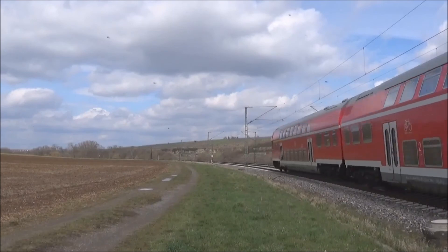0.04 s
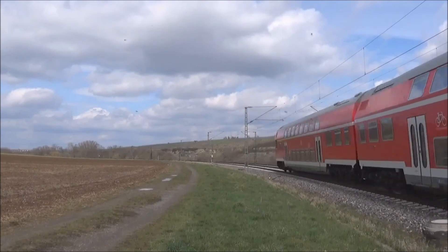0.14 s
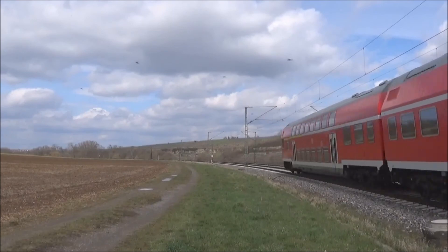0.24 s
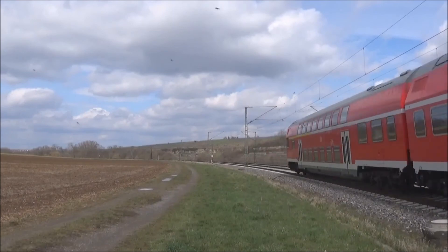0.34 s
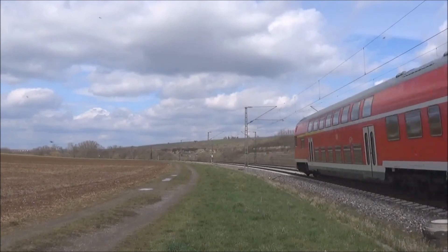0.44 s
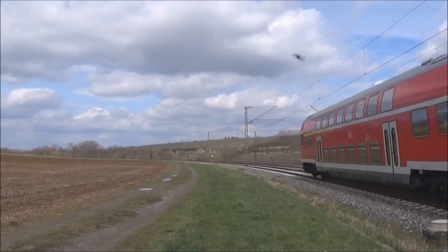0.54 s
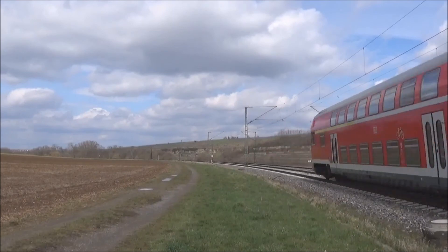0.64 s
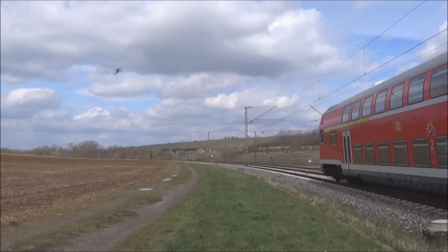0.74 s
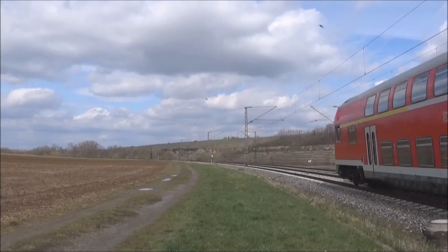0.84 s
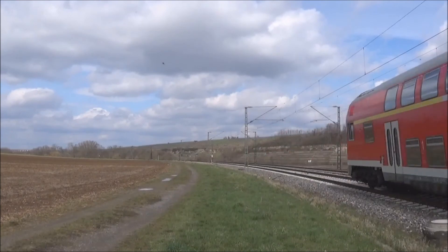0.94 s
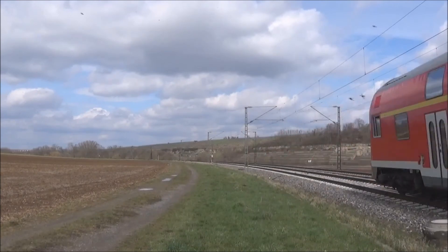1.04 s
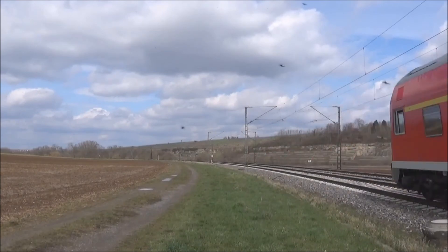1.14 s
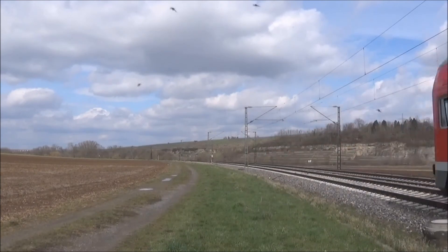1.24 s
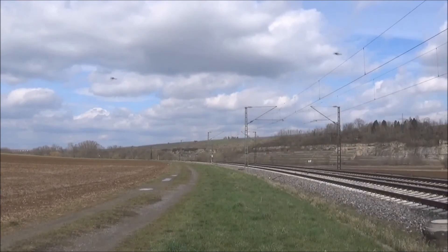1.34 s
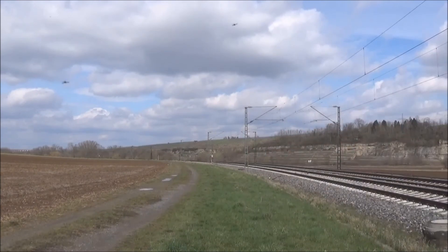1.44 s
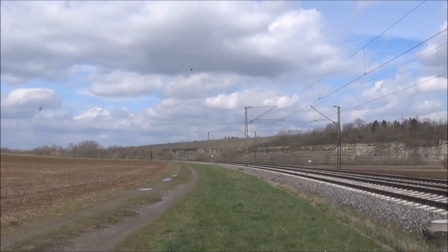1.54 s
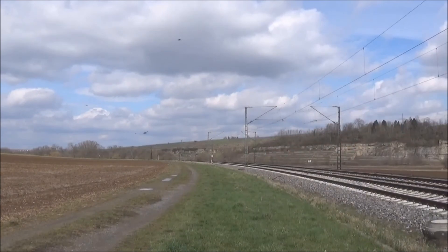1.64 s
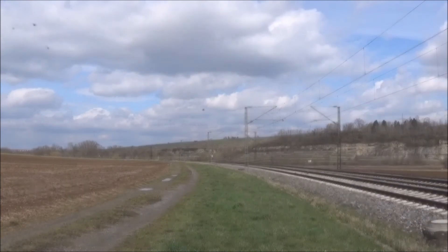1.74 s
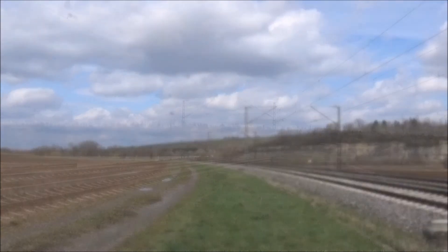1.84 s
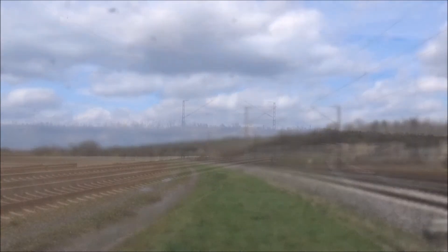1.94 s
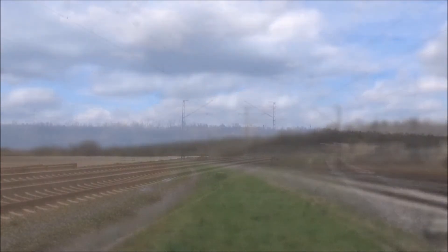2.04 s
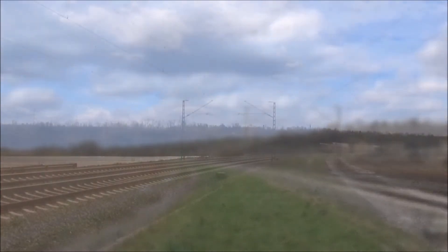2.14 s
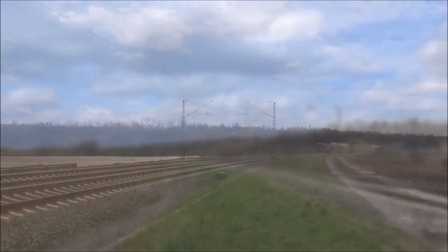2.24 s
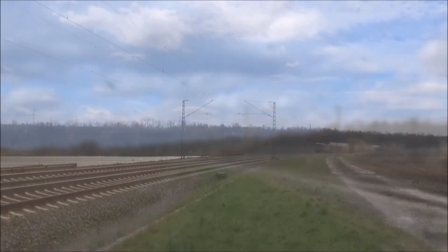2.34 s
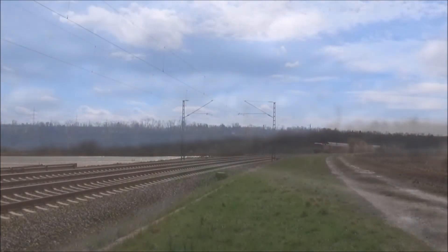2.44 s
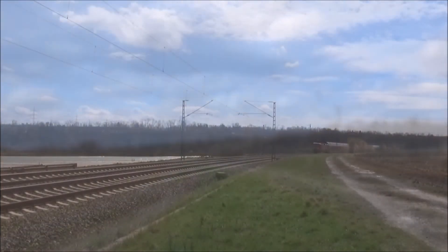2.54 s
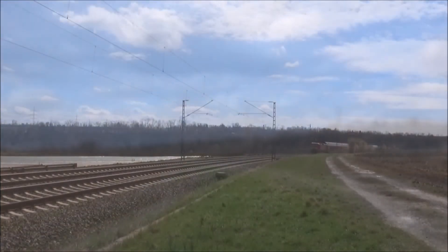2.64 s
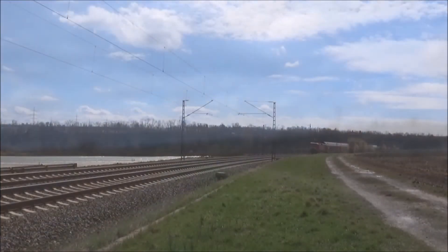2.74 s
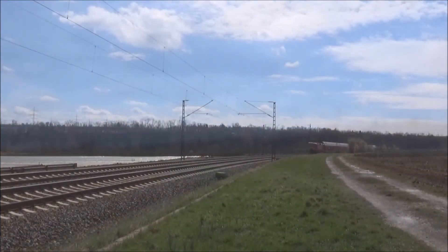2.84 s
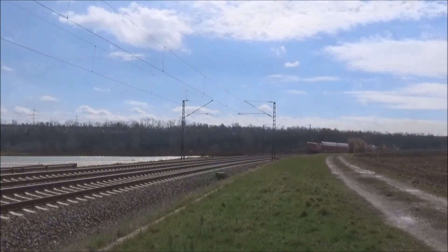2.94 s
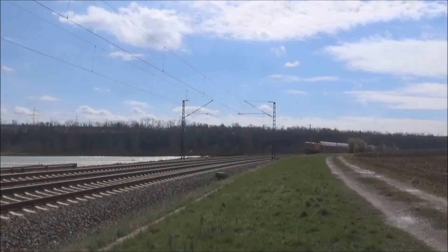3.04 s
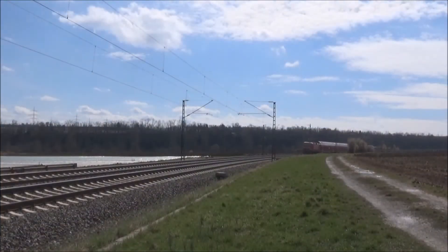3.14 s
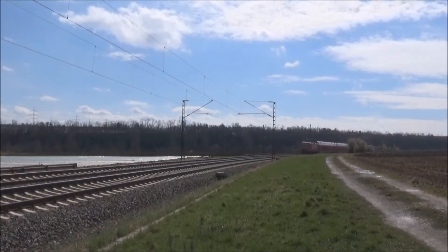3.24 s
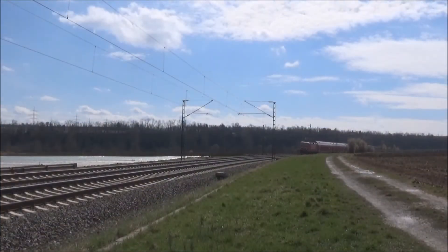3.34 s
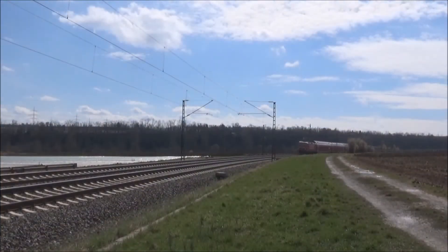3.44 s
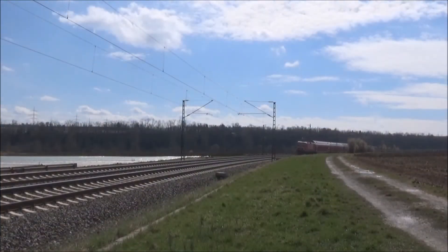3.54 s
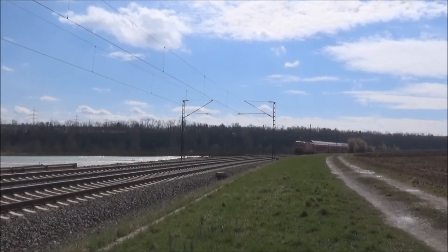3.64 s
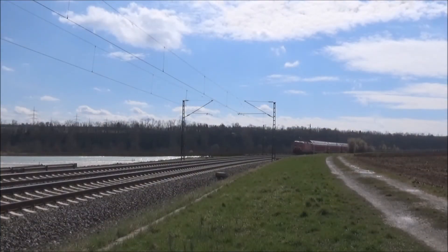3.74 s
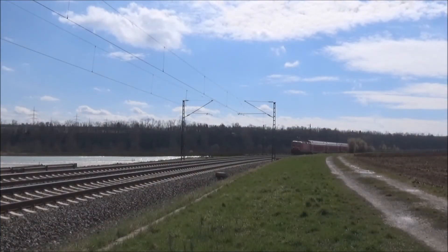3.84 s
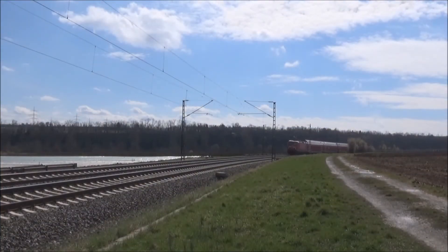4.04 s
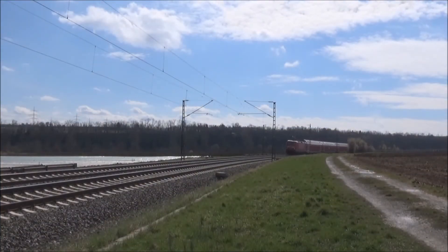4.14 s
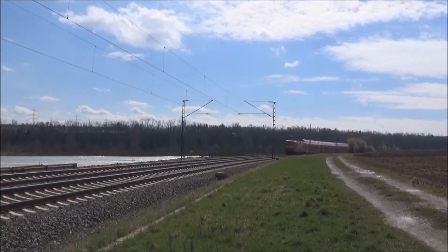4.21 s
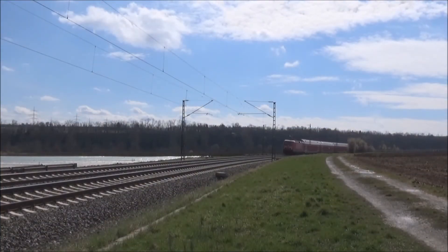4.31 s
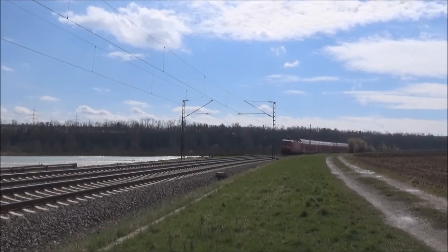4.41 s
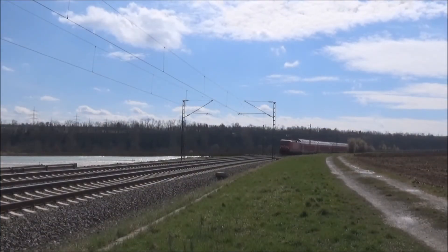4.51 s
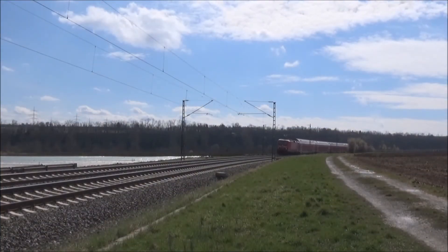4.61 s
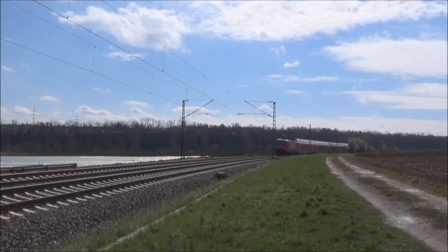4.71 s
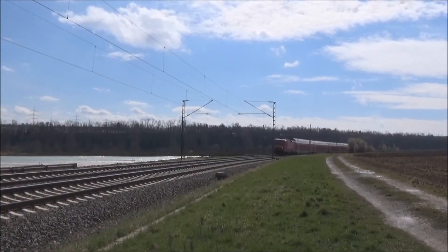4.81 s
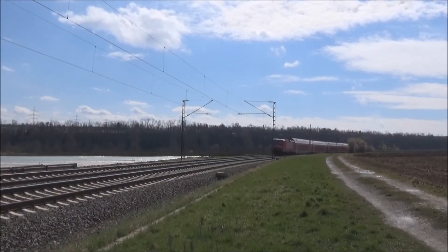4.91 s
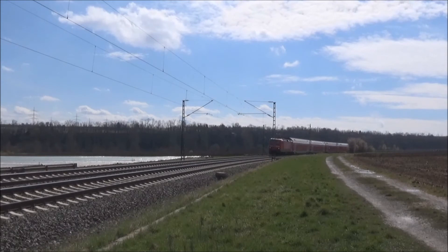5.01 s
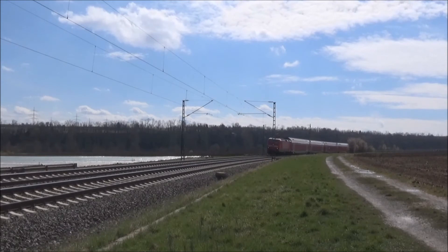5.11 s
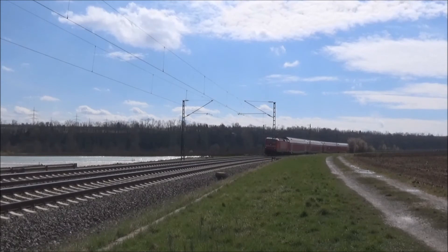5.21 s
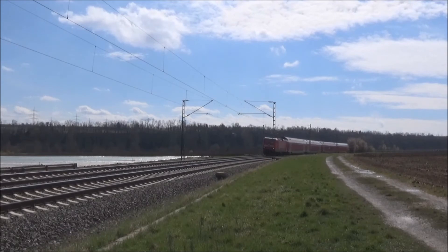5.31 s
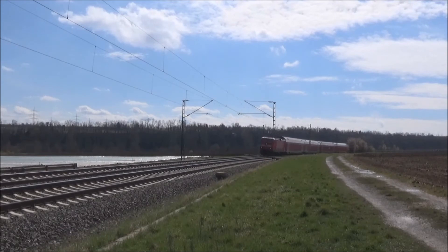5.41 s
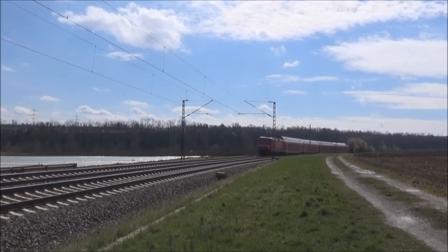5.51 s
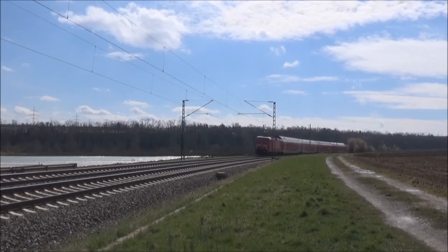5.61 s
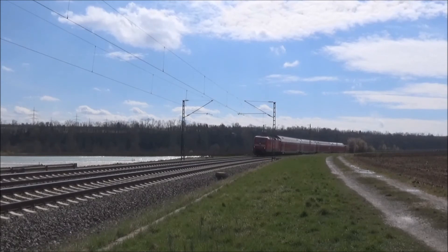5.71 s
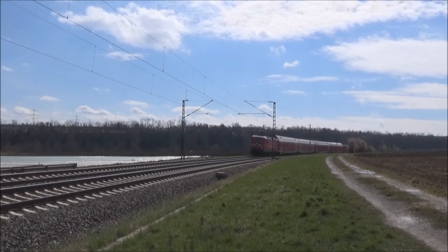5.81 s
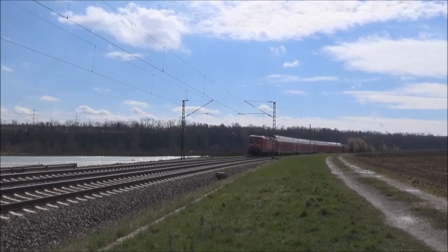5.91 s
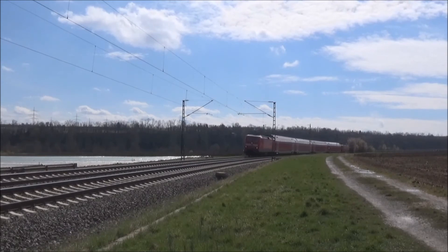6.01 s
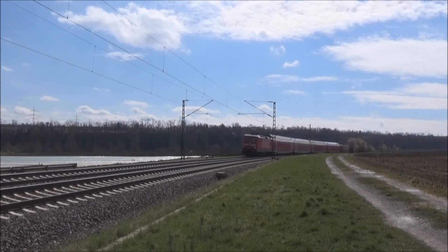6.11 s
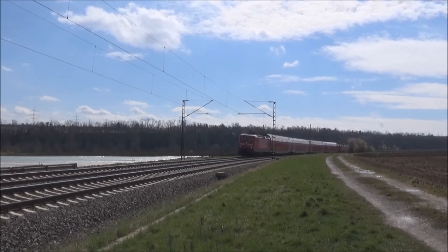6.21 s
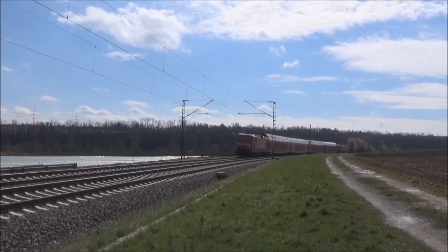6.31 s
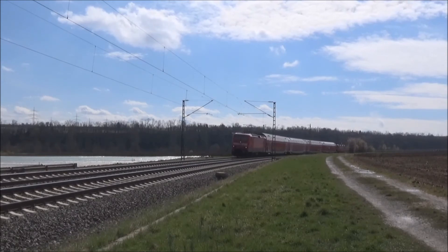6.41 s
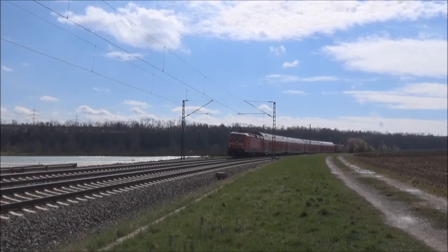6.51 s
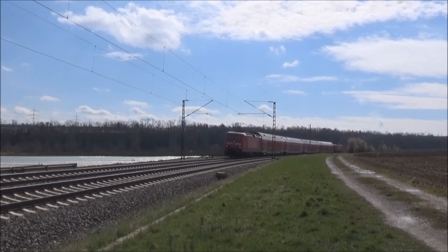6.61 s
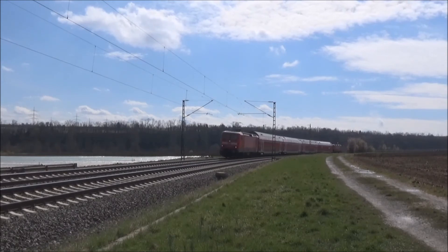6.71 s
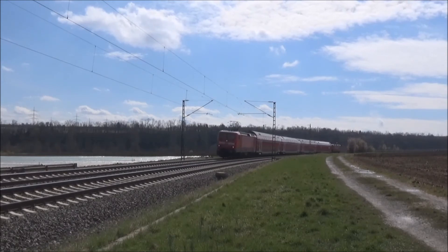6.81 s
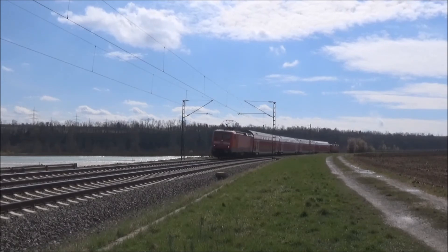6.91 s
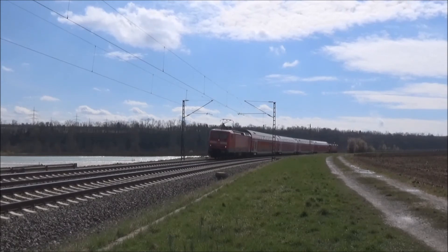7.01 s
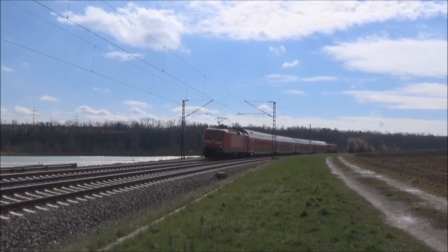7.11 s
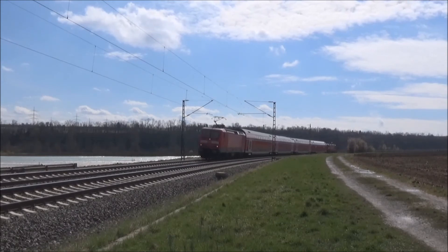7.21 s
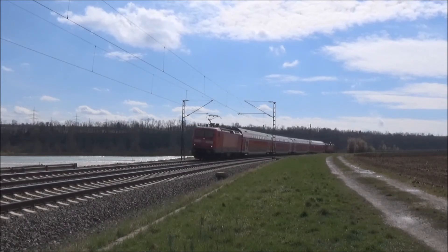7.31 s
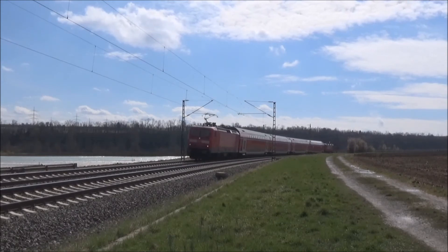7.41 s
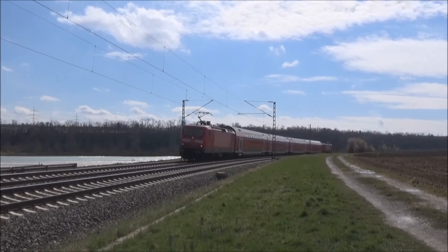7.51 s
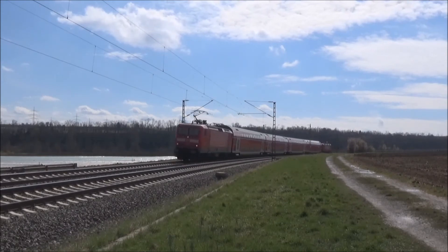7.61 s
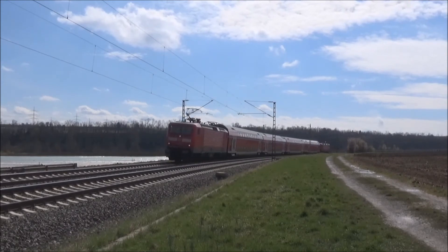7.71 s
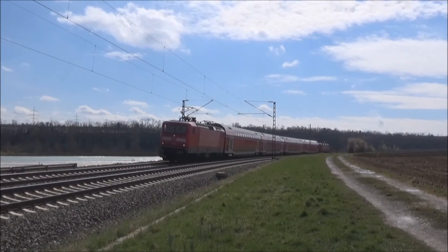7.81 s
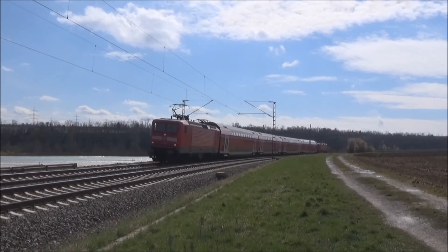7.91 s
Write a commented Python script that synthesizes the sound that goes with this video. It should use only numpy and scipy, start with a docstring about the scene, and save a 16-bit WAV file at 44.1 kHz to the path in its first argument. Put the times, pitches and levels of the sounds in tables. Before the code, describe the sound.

Stereo lineside pickup, outdoors and close to the track: broad rumbling, rolling and airy rush from departing coaches, leaning right, drop away into soft regular thumps. Thin high rail singing follows, with low lumpy gusts on the microphone and gritty metallic ticks. A hard crack comes as a strong, fluttering high hiss sets in, over the growing hum, whine, drone and rolling of an approaching electric train.

```python
"""Two electric trains from the lineside

Two microphone ports beside a railway. The last cars of a train roar past on the right and fade, a wheel flat
thumping. A second train nears round a curve: the rails sing ahead of it, its flanges hiss, its rolling swells.
Wind buffets the ports, the right rail ticks and one sharp crack rings out. Trains, rail and wind are filtered
noise with moving levels; thuds are short tone bursts that swell and die evenly; ticks and the crack are short
decaying tones, the crack with a noise snap.
"""
import sys
import numpy as np
from scipy import signal
from scipy.fft import rfft, irfft, next_fast_len
from scipy.io import wavfile
from scipy.ndimage import uniform_filter1d, map_coordinates

SR = 44100
rng = np.random.default_rng(int(sys.argv[2]) if len(sys.argv) > 2 else 0)


def undo_db(level):
    """Turn decibels back into plain size, where 20 dB means ten times bigger."""
    steps = np.asarray(level, float) / 20
    return 10 ** steps


def transcribe(signal):
    """Save signal, clipped to [-1, 1], as a 16-bit WAV file at the path in sys.argv[1]."""
    frames = np.atleast_2d(signal).T
    limited = np.clip(frames, -1, 1)
    pcm = np.round(limited * 32767).astype(np.int16)
    wavfile.write(sys.argv[1], SR, pcm)


N = 350595
T = np.arange(N) / SR
SIZE = next_fast_len(N)
HZ = np.fft.rfftfreq(SIZE, 1 / SR)
MIDDLE_DB = -42  # nearing train at middle closeness


def unit(x):
    """Scale to rms 1."""
    return x / np.sqrt(np.mean(x ** 2) + 1e-20)


def along(rows):
    """Columns after the frequency, read on a log axis."""
    hz, *cols = np.transpose(rows)
    return [np.interp(np.log(HZ + 1), np.log(hz + 1), c) for c in cols]


def curves(rows, rise_db=0., fall_db=0.):
    """Levels per sample; they climb before the first row and sink after the last by so many dB a second."""
    s, *cols = np.transpose(rows)
    edge = rise_db * np.maximum(s[0] - T, 0) + fall_db * np.maximum(T - s[-1], 0)
    return [np.interp(T, s, c) - edge for c in cols]


def tent(peak_s, rise_db, fall_db, hold_s=0.):
    """0 dB from peak_s for hold_s, climbing before and sinking after by so many dB a second."""
    return -rise_db * np.maximum(peak_s - T, 0) - fall_db * np.maximum(T - peak_s - hold_s, 0)


def wobble(rate):
    """A smooth random curve, rate knots a second."""
    return map_coordinates(rng.standard_normal(int(N * rate / SR) + 4), [T * rate])


def ports(gain, alike, lead, pan_db):
    """Spectra of one noise source at the left and right ports, mixed to the wanted likeness."""
    noise = rng.standard_normal((2, len(HZ))) + 1j * rng.standard_normal((2, len(HZ)))
    shared, apart = gain * noise
    turn = np.arccos(np.clip(alike, 0, 1)) / 2
    left = (np.cos(turn) * shared + np.sin(turn) * apart) * undo_db(pan_db / 2) * np.exp(.5j * lead)
    right = (np.cos(turn) * shared - np.sin(turn) * apart) * undo_db(-pan_db / 2) * np.exp(-.5j * lead)
    return np.array([left, right])


def patches(shape, bins, frames):
    """Random gains of rms 1, smoothed over so many frequency bins and time frames."""
    across = uniform_filter1d(rng.standard_normal(shape), size=bins, axis=0)
    return unit(uniform_filter1d(across, size=frames, axis=1))


def patchy(spectra, patchy_db):
    """Sound of the spectra with random patches of gain; the mean of the ports has rms 1."""
    z = signal.stft(irfft(spectra, SIZE)[:, :N], nperseg=512)[2]
    brief_broad = patches(z.shape[1:], bins=6, frames=5)
    long_narrow = patches(z.shape[1:], bins=2, frames=30)
    gain = undo_db(patchy_db * (0.74 * brief_broad + 0.61 * long_narrow))
    pair = signal.istft(z * gain, nperseg=512)[1][:, :N]
    return pair / np.sqrt(np.mean(pair.mean(axis=0) ** 2))


def roar(spectrum, image, patchy_db):
    """Broad noise placed between the ports."""
    return patchy(ports(undo_db(along(spectrum)[0]), *along(image)), patchy_db)


def sing(modes, image, patchy_db):
    """Roughness drives each resonance; steel confines it to a steep-sided band."""
    power = sum((undo_db(db) / (1 + (2 * (HZ - hz) / width) ** 4)) ** 2 for hz, width, db in modes)
    return patchy(ports(np.sqrt(power), *along(image)), patchy_db)


def add(track, s, sound):
    """Mix a short sound in at time s."""
    at = round(s * SR)
    track[at:at + len(sound)] += sound


# Colours of the leaving train's layers: [f/Hz, relative level/dB per Hz]
RUMBLE = [(30, -74), (60, -17.5), (110, -11), (180, 1), (300, -3.5), (450, -8.5), (600, -33)]
BOGIE = [(280, -26), (400, -1), (550, 2), (700, 0.5), (900, -2.5), (1100, -36)]
ROLLING = [(750, -36), (900, -1.5), (1350, -1), (1500, -6), (1900, -63)]
WHEEL_RING = [(1200, -34), (1500, -0.5), (2250, 0.5), (2550, -4.5), (2800, -1), (4000, -6.5), (4700, -64)]
AIR_RUSH = [(3400, -51), (4000, 0), (5000, -1), (5900, 0.5), (7000, -4.5), (8500, -8), (11100, -17)]
# How the leaving train falls on the ports: [f/Hz, likeness/0-1, left lead/rad, left over right/dB]
LEAVING_IMAGE = [(100, 1, -0.48, -0.5), (250, 0.93, -0.17, -4.5), (580, 0.7, -0.21, -9.5),
                 (1120, 0.76, 0.69, -12), (1780, 0.22, 0.72, -8), (3200, 0.45, 0.72, -5),
                 (5900, 0.73, 0.14, -4), (8240, 0.3, -0.24, -5), (9600, 0.75, -0.23, 6.5),
                 (10800, 1, 0, -1)]
# The leaving train's fade: [t/s, level/dB]
FADE = [(0.0, -1), (0.35, -1), (0.8, -1.5), (1.2, -3), (1.5, -4.5), (1.8, -9), (2.1, -18), (2.4, -24.5),
        (2.7, -31)]
# Rumble, bogie, rolling, wheel ring, air rush: [full level/dB, share of the fade, lateness/s, centre f/Hz]
LEAVING_LAYERS = [(-24.5, 0.96, 0.23, 240), (-24, 1.1, 0.17, 550), (-24, 0.68, -0.19, 1150),
                  (-23.5, 1.15, -.08, 2000), (-25.5, 1.19, 0.081, 7100)]
# Bogies going by, each with its own colour: [t/s, level/dB, centre f/Hz]
BOGIE_SURGES = [(0.2, 2.5, 553), (0.4, 3, 1200), (0.4, 1, 200), (0.7, 2.5, 2930), (0.95, 2.5, 900),
                (1.0, 2, 200), (1.35, 2.5, 497), (1.4, 4, 5500), (1.5, 2.5, 2510)]


def bogie_surges(hz):
    """Lift in dB at frequency hz as each bogie goes by, bell-shaped in time and pitch."""
    length_s, spread_octaves = 0.12, 0.76
    lift = 0
    for s, lift_db, centre_hz in BOGIE_SURGES:
        distance = ((T - s) / length_s) ** 2 + (np.log2(hz / centre_hz) / spread_octaves) ** 2
        lift += lift_db * np.exp(-distance)
    return lift


def leaving_train():
    """Bogies, wheels and air rush of the cars going by as bands of noise, with one singing wheel."""
    shudder_db = 0.58 * wobble(8.87) + 0.88 * wobble(24.77)
    fade_db, = curves(FADE, fall_db=30)
    wheel_db = -34.5 + 0.82 * fade_db + 2.9 * wobble(9)
    # wheel resonance: f/Hz, width/Hz, level/dB
    sound = undo_db(wheel_db) * sing([(707, 69, 0)], LEAVING_IMAGE, patchy_db=2.5)
    spectra = RUMBLE, BOGIE, ROLLING, WHEEL_RING, AIR_RUSH
    for (db, share, late_s, hz), spectrum in zip(LEAVING_LAYERS, spectra):
        layer_fade_db = share * np.interp(T - late_s, T, fade_db)
        level_db = db + layer_fade_db + bogie_surges(hz) + shudder_db
        sound += undo_db(level_db) * roar(spectrum, LEAVING_IMAGE, patchy_db=1.0)
    return sound


def wheel_flat():
    """A dull tone burst of a cycle and a half each time the flat meets the rail, duller as it recedes."""
    track, t = np.zeros(N), np.arange(-400, 400) / SR
    start_s, turn_s, thuds = 1.7655, .1023, 12  # start of the first burst, time of a wheel turn, count
    for k, scatter in enumerate(rng.standard_normal(thuds)):
        hz = 260 - 5.5 * k
        half_length_s = .003 + 0.00021 * k
        thud = np.cos(2 * np.pi * hz * t) * np.exp(-(t / half_length_s) ** 2)  # swells and dies evenly
        add(track, start_s + turn_s * k, undo_db(1.9 * scatter) * thud)
    level_db = -17 + tent(2.1, rise_db=17, fall_db=30.5)
    return track * undo_db(level_db) * undo_db([[-2.1], [2.1]])  # leans right


# How the rail falls on the ports, the left one deaf near 8 kHz:
# [f/Hz, likeness/0-1, left lead/rad, left over right/dB]
RAIL_IMAGE = [(1200, 0.77, 0.26, 8.5), (2320, 1, -0.5, 6.5), (6060, 1, -1.44, 7), (7000, 0.7, -2, 3),
              (7670, 0.7, -3, -4), (7940, 0.82, -2.5, -12), (8220, 0.1, -2.5, -16), (8350, 0.2, 2.2, -9),
              (8800, 1, -3, -17.5), (8800, 1, -3.5, -13), (8900, 1, 3, -5), (9500, 0.95, -0.1, -3),
              (10900, 0.99, 0, -1.5)]
# Far singing of the rail: [t/s, level/dB]
SINGING = [(2.3, -52.5), (2.65, -58), (3.2, -52.5), (3.55, -51), (3.8, -45), (4.6, -44.5), (4.8, -42.5)]
# Resonances of the far singing: [f/Hz, width/Hz, relative level/dB]
FAR_MODES = [(5860, 250, -4.5), (5950, 65, 3.5), (6040, 310, -11), (7740, 550, -1), (8300, 230, -4),
             (8800, 490, -15), (9680, 83, 2), (9930, 490, -11), (10600, 70, -7), (10950, 160, -13)]


def far_singing():
    """High rail resonances, driven by roughness, sing ahead of the second train."""
    level_db, = curves(SINGING, rise_db=20, fall_db=8)
    return undo_db(level_db + 1.9 * wobble(25)) * sing(FAR_MODES, RAIL_IMAGE, patchy_db=-0.5)


# Vibration of the nearing train carried by the rails: [t/s, level/dB]
RAIL_VIBRATION = [(2.4, -54), (2.65, -52), (3.15, -45.5), (3.55, -43), (3.85, -40.5), (4.35, -37.5),
                  (4.6, -38.5), (4.95, -34.5), (5.15, -37.5), (5.35, -35), (5.6, -36.5), (5.97, -36),
                  (6.15, -32), (6.55, -32.5), (6.75, -40), (6.95, -34.5), (7.3, -36.5), (7.6, -34.5),
                  (7.8, -33.5), (7.95, -42)]
# Resonances of the hum, then of the whine: [f/Hz, width/Hz, relative level/dB]
HUM = [(990, 85, -5), (1084, 81, -1), (1169, 92, 3), (1308, 120, 0.5), (1426, 93, -1.5)]
WHINE = [(2322, 113, 0), (2295, 180, -11.5)]


def rail_hum():
    """Hum and whine of the nearing train carried by the rails; the whine gains on the hum once near."""
    hum_db, = curves(RAIL_VIBRATION, rise_db=20)
    near_s, gain_db = 4.36, 3  # whine gain in dB a second
    whine_db = MIDDLE_DB - 13 + 0.97 * (hum_db - MIDDLE_DB) + gain_db * np.maximum(T - near_s, 0)
    hum = undo_db(hum_db + 0.31 * wobble(18)) * sing(HUM, RAIL_IMAGE, patchy_db=2.0)
    whine = undo_db(whine_db + 2.26 * wobble(21)) * sing(WHINE, RAIL_IMAGE, patchy_db=0.5)
    return hum + whine


# Closeness of the nearing train, as its rolling through the air: [t/s, level/dB]
CLOSENESS = [(2.75, -57.5), (3.05, -57.5), (3.55, -53), (4.3, -46), (4.8, -42), (5.3, -42), (5.9, -40.5),
             (6.6, -37), (6.9, -38.5), (7.2, -35), (7.45, -34), (7.65, -32), (7.78, -30), (7.95, -32)]
# How the nearing train falls on the ports: [f/Hz, likeness/0-1, left lead/rad, left over right/dB]
NEARING_IMAGE = [(100, 1, -1.1, -1.5), (600, 0.95, 0.6, 0.88), (1800, 0.85, -0.1, 0.86),
                 (3740, 0.7, -0.3, .1), (4610, 0.073, -5.5, 2.4), (6850, 0.56, -0.5, 3),
                 (10000, 0.48, 3, 1)]
# Colours of its rolling and its brighter rush: [f/Hz, relative level/dB per Hz]
FAR_ROLLING = [(500, -33), (720, -7), (830, 3), (1000, -4), (1900, -1.5), (2900, -1.5), (3100, -3),
               (3800, -5), (4400, -9), (5500, -21.5)]
FAR_RUSH = [(2500, -27), (3500, -18.5), (4000, -0.5), (4450, 1.5), (4800, -0.5), (5000, -3), (5500, -1),
            (7000, -5.5), (9000, -10), (10500, -21), (11100, -24)]
# Resonances of its drone, then of its motor: [f/Hz, width/Hz, relative level/dB]
DRONE = [(132, 96, -5.5), (302, 138, 2.5), (610, 430, -6.5)]
MOTOR = [(526, 84, 0)]


def nearing_train():
    """Drone, motor and rolling carried by the air, brighter as the train closes in."""
    rolling_db, = curves(CLOSENESS, rise_db=20)
    nearer_db = rolling_db - MIDDLE_DB
    drone_full_db = -5  # the drone stops growing early
    drone_db = -42.5 + 1.16 * np.minimum(nearer_db - drone_full_db, 0)
    motor_db = -58.5 + 1.16 * nearer_db
    rush_db = -49 + 1.28 * nearer_db
    sound = undo_db(drone_db + 0.25 * wobble(16)) * sing(DRONE, NEARING_IMAGE, patchy_db=1.5)
    sound += undo_db(motor_db) * sing(MOTOR, NEARING_IMAGE, patchy_db=2.0)
    for db, spectrum in ((rolling_db, FAR_ROLLING), (rush_db, FAR_RUSH)):
        sound += undo_db(db + 0.58 * wobble(12)) * roar(spectrum, NEARING_IMAGE, patchy_db=1.0)
    return sound


# Gusts across the ports: [start t/s, length/s, level/dB]
GUSTS = [(3.444, 0.16, -41), (3.62, 0.16, -42.5), (3.852, 0.11, -34.5), (4.063, .12, -34),
         (4.197, .08, -29), (4.295, 0.076, -28), (4.428, 0.13, -29.5), (4.607, 0.066, -29.5),
         (4.694, 0.087, -25.5), (4.83, .07, -29), (5.075, .15, -39), (5.252, 0.24, -38), (5.5, 0.16, -43.5),
         (5.815, 0.023, -33), (5.95, 0.11, -38), (6.17, .06, -41.5), (6.4, 0.27, -42), (6.88, 0.028, -52),
         (7.1, .35, -53.5), (7.518, .03, -43), (7.743, 0.032, -45.5)]
# Colour of the buffeting: [f/Hz, relative level/dB per Hz]
BUFFET = [(30, -50), (60, -20.5), (110, -4.5), (170, 1), (300, -1.5), (500, -10.5), (900, -22),
          (2000, -59.5)]
# How the wind falls on the ports: [f/Hz, likeness/0-1, left lead/rad, left over right/dB]
BUFFET_IMAGE = [(100, 1, 0.25, .1), (253, 0.4, 0.61, .1), (600, 0.017, 0.19, .1)]


def wind():
    """Lumpy buffeting in gusts that strike fast and die slower, over a slowly dying light breeze."""
    rise_db, fall_db = 300, 117  # dB a second
    breeze = undo_db(-52 + tent(GUSTS[0][0], rise_db, fall_db=3))
    gusts = np.max([undo_db(db + tent(s, rise_db, fall_db, length)) for s, length, db in GUSTS], axis=0)
    own_lumps = np.array([wobble(25), wobble(25)])  # one curve a port
    lumps = undo_db(0.9 * wobble(30) + 2.0 * own_lumps)
    return (breeze + gusts) * unit(lumps * roar(BUFFET, BUFFET_IMAGE, patchy_db=-2.0))


# Ticks of the rail: [t/s, strength/dB]
TICKS = [(3.9863, -40), (4.2667, -23.5), (4.346, -29), (4.51, -26), (4.8224, -25)]
# Partials of a tick: [f/Hz, relative level/dB]
PING = [(6050, -6.5), (8050, -6), (8300, -2), (8520, 0.5), (10050, -10), (10950, -17)]


def ticks():
    """Short gritty pings on the right rail: a few high partials of random phase, falling 60 dB in 32 ms."""
    pings, t = np.zeros(N), np.arange(SR // 20) / SR
    for s, db in TICKS:
        ring = 0
        for hz, level in PING:
            ring += undo_db(level + rng.normal(0, 2)) * np.sin(2 * np.pi * hz * t + rng.uniform(0, 2 * np.pi))
        onset = 1 - np.exp(-t / 0.0014)
        add(pings, s, undo_db(db - 2.5 - 60 * t / 0.032) * ring * onset)
    return pings * undo_db([[-6.5], [3.5]])


# The flanges ease off the rail, or bite harder where the depth is negative:
# [t/s, depth/dB, change/s, return/s]
LIFTS = [(4.976, 20, 0.0088, 0.033), (5.035, -7, .012, 0.0099), (5.2, 0.5, .1, 0.046),
         (5.27, -5, .02, 0.042), (6.0, 9.5, 0.2, 0.036), (6.05, 3, .05, 0.44), (7.11, 6.5, 0.16, 0.19),
         (7.66, 0, 0.49, 0.15)]
# Resonances of the main, upper and lower hiss: [f/Hz, width/Hz, relative level/dB]
HISS = [(7280, 800, -16.5), (7760, 310, -3.5), (8160, 570, -5.5), (8360, 100, 3), (8610, 290, -2),
        (8460, 270, -15)]
HISS_TOP = [(9300, 1500, -7), (10020, 310, 0), (10340, 350, -5), (10570, 100, -14), (10750, 300, -13),
            (10960, 120, -6)]
HISS_LOW = [(5840, 290, -5.5), (6046, 133, 1), (6330, 300, -11.5)]


def flange_hiss():
    """Flanges rubbing the curve drive three bands of rail resonances, fluttering together."""
    touch_s = 4.895
    contact_db = tent(touch_s, rise_db=700, fall_db=0)
    for s, depth_db, ease_s, back_s in LIFTS:
        contact_db = contact_db - np.interp(T, [s - ease_s, s, s + back_s], [0, depth_db, 0])
    sag_db = 6 * np.exp(-((T - 6.7) / 0.25) ** 2)  # the lower hiss sags for a while
    flutter_db = 0.78 * wobble(38) + 0.82 * wobble(13)
    sound = undo_db(-30 + contact_db + flutter_db) * sing(HISS, RAIL_IMAGE, patchy_db=-1.5)
    # level at first touch, gain in dB a second
    for db, gain_db, modes in ((-39.5, 3.5, HISS_TOP), (-39.5 - sag_db, 0.87, HISS_LOW)):
        level_db = db + gain_db * (T - touch_s) + .55 * contact_db + 1.2 * flutter_db
        sound += undo_db(level_db) * sing(modes, RAIL_IMAGE, patchy_db=0.5)
    return sound


# One sharp crack of the rail: [t/s, strength/dB]
CRACK = [(5.0092, -12.5)]
# Modes of the crack: [f/Hz, relative level/dB, time to fall 60 dB/s]
CRACK_MODES = [(850, -1, .02), (1900, -4, .008), (3000, -7, .006), (4100, -2, .012), (5600, -5, .01),
               (10000, -9, .006)]


def rail_crack():
    """A broad crack: quickly damped modes of the rail start together under a snap of bright noise."""
    crack, t = np.zeros(N), np.arange(SR // 20) / SR
    for s, db in CRACK:
        ring = sum(undo_db(level - 60 * t / t60) * -np.cos(2 * np.pi * hz * t) for hz, level, t60 in CRACK_MODES)
        grit = np.gradient(uniform_filter1d(rng.standard_normal(len(t)), size=5))
        snap = grit * undo_db(10 - 60 * t / .014)
        add(crack, s, undo_db(db - 7) * (ring + snap))
    return crack * undo_db([[-1.1], [1.1]])


def scene():
    """Both trains, the rail and the wind at the two ports."""
    trains = leaving_train() + wheel_flat() + nearing_train()
    rail = far_singing() + rail_hum() + ticks() + flange_hiss() + rail_crack()
    return trains + rail + wind()


def roll_off(x):
    """The treble ends steeply here."""
    return signal.sosfilt(signal.butter(12, 11160, fs=SR, output="sos"), x)


def record(dry):
    """The camera keeps nothing above its band limit and rounds off the loudest peaks."""
    top_hz, slope_hz = 11130, 120
    band_limit = np.clip((top_hz - HZ) / slope_hz, 0, 1) ** 2
    band = irfft(rfft(dry, SIZE) * band_limit, SIZE)[:, :N]
    rounded = band / (1 + np.abs(band / .95) ** 6) ** (1 / 6)
    return roll_off(rounded)


dry = scene()
out = record(dry)
transcribe(out)
```